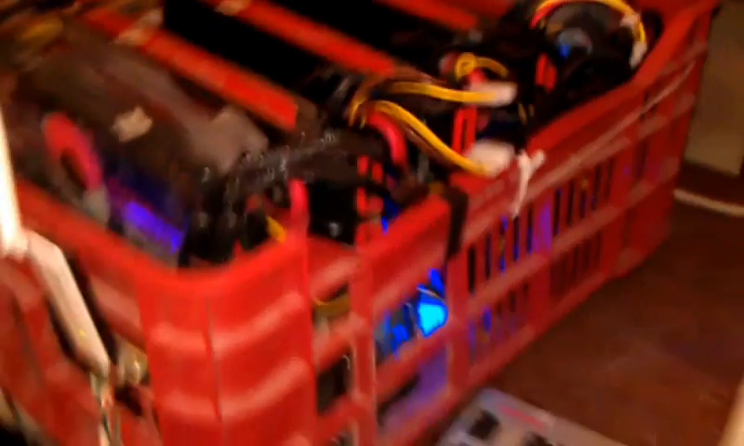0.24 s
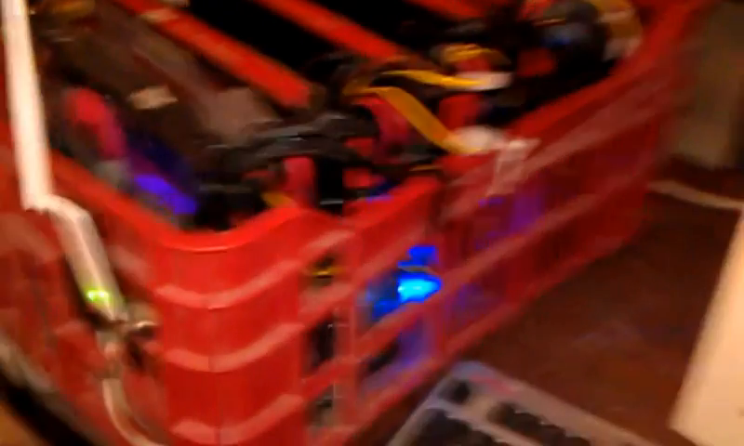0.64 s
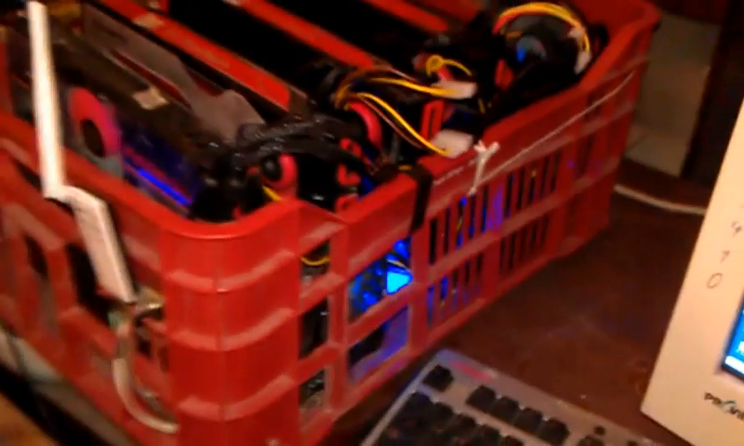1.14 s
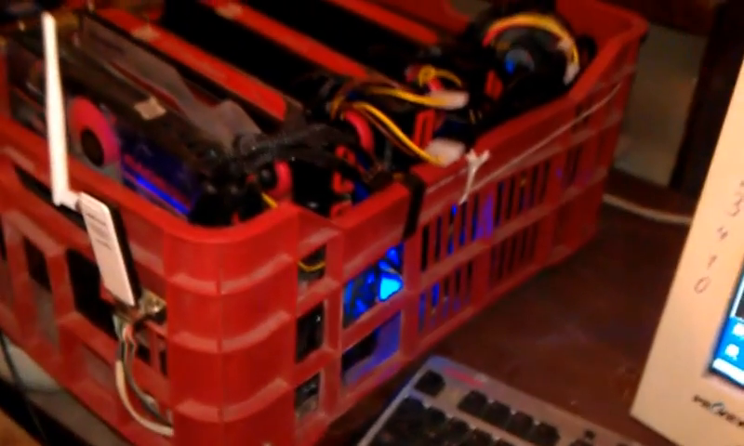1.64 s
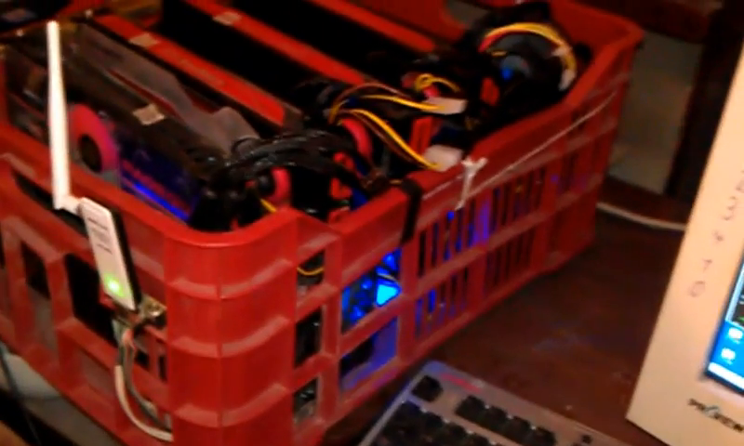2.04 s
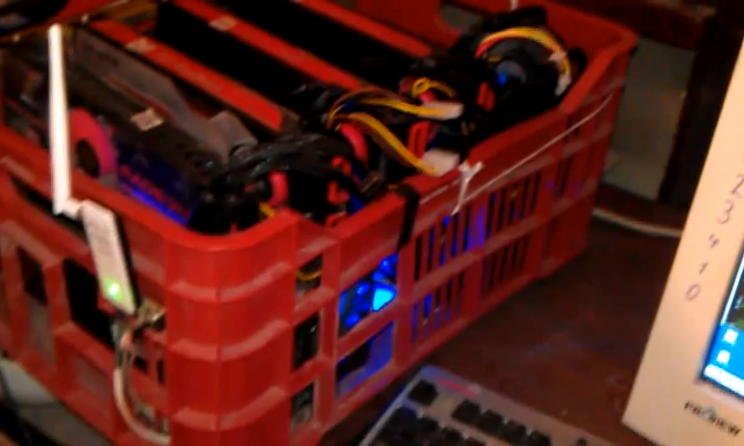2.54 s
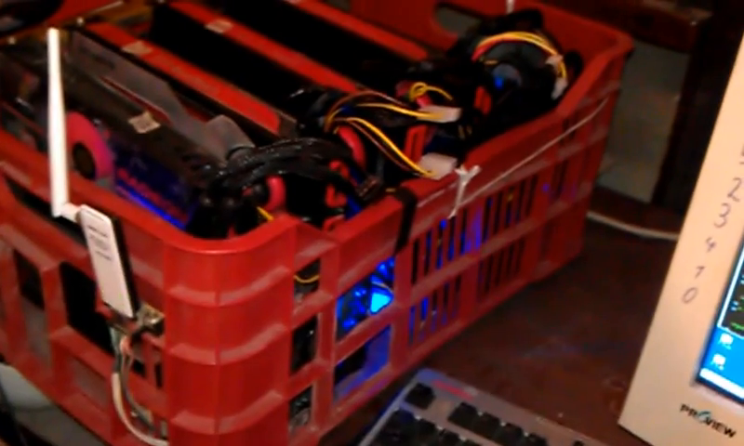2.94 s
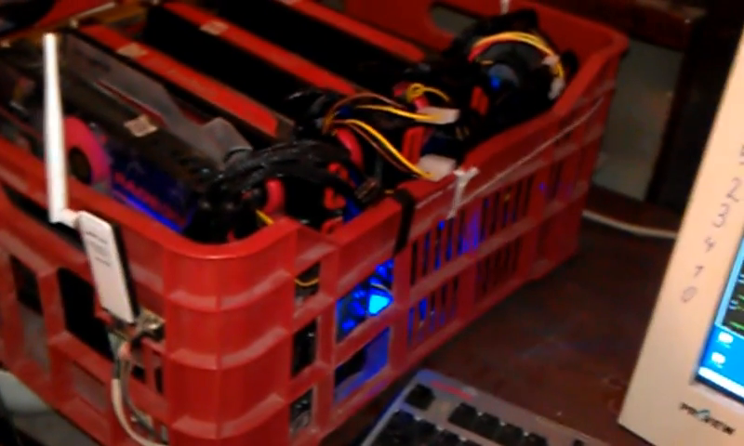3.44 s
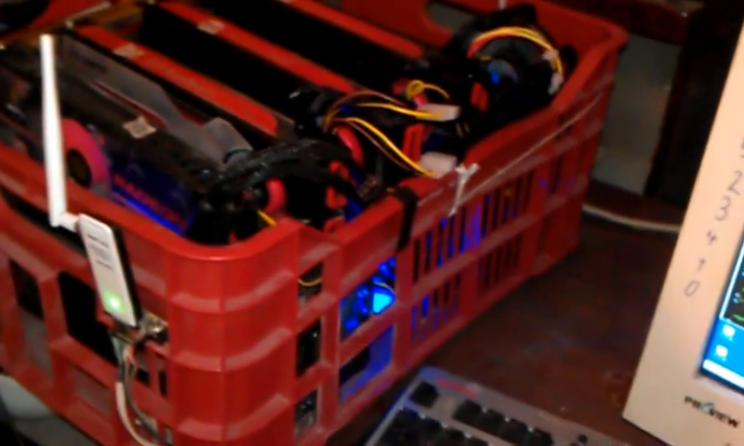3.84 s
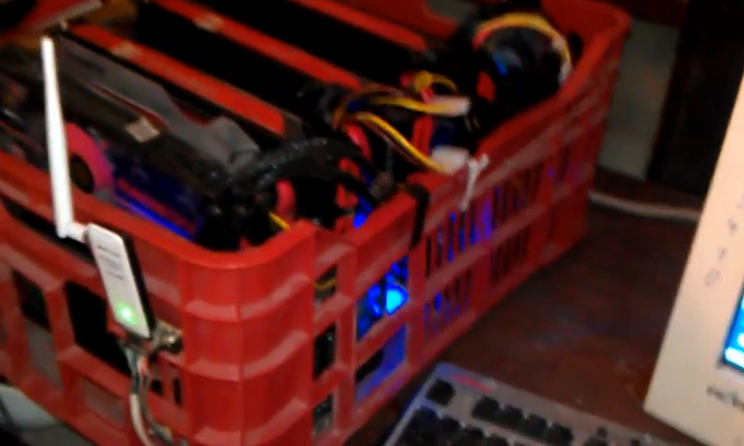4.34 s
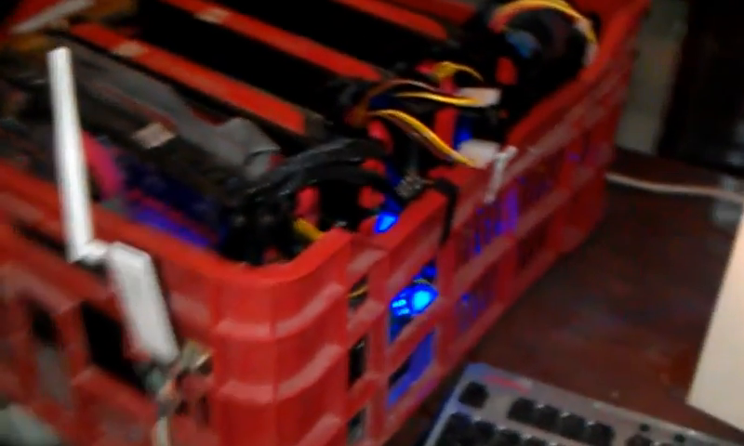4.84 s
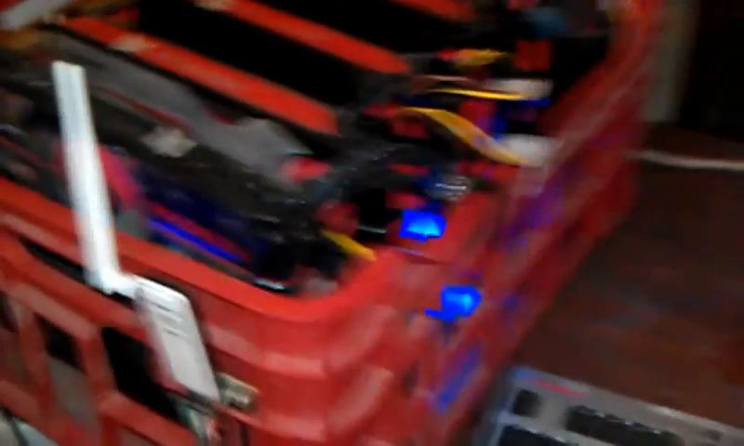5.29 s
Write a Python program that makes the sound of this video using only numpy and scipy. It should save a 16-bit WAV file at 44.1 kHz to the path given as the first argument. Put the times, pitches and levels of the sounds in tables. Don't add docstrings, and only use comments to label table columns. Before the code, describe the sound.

A loud, continuous whoosh of many small computer fans fills the whole 5.5 seconds, even and nearly flat, with hollow midrange coloration from the crate and a narrow, hissy treble peak from a hand-held camera's mono microphone. Faint hums sit inside it around 300 and 450 Hz, the lower one slowly beating. At 0-1 s fingers brush the camera body, strongest around 0.26 s, with shorter rubs at 0.6 and 0.8 s and dull bumps at about 0.8-0.9 s; thin coil whines near 3.5 kHz come and go. The rush settles a little as the camera backs away, leaving steady air from 1.5 to 3.5 s. Around 4 s a breathy whistle near 1.9 kHz strengthens, then drops as the camera turns. At 4.6 s the plastic shell gives a quick, crackling creak with a small knock. A faint rub follows at 5.3 s while the fan hum grows to the end. Weak treble flickers throughout, with tiny stereo puffs.

```python
import sys
import numpy as np
from scipy import signal
from scipy.fft import rfft, irfft, next_fast_len
from scipy.io import wavfile
from scipy.ndimage import uniform_filter1d

SR = 44100
rng = np.random.default_rng(int(sys.argv[2]) if len(sys.argv) > 2 else 0)


def to_wav(sig):
    pcm = np.clip(np.atleast_2d(sig), -1, 1) * 32767
    pcm = np.round(pcm).astype(np.int16)
    wavfile.write(sys.argv[1], SR, pcm.T)


def level_to_linear(level):
    exponent = np.asarray(level, float) / 20
    return 10 ** exponent


N = 243431

# time_s, nearness to the crate corner [0-1], facing the heat sinks [0-1]
CAMERA_POSE = [
    (0, 0.9, 0.7),
    (.6, 0.57, 0.73),
    (1.0, 0.34, 0.7),
    (2.5, 0.04, 0.75),
    (3.5, 0.27, 0.66),
    (4.0, 0.43, 0.93),
    (4.42, 0.4, 0.76),
    (4.56, 0.6, 0.2),
    (5.05, 0.42, 0.1),
    (5.52, 1.0, .2),
]


def evened(x):
    return x / np.sqrt(np.mean(x ** 2) + 1e-20)


def read(points, hz):
    f, value = np.transpose(points)
    return np.interp(np.log(hz + 1), np.log(f + 1), value)


def columns(rows, t):
    s, *values = np.transpose(rows)
    return [np.interp(t, s, v) for v in values]


def bell(hz, centre_hz, width_hz):
    return 1 / (1 + (2 * (hz - centre_hz) / width_hz) ** 2)


def lift_db(hz, centre_hz, width_hz, db):
    return 10 * np.log10(1 + (level_to_linear(db) ** 2 - 1) * bell(hz, centre_hz, width_hz))


def drift(t, rate):
    f, phase = np.geomspace(rate / 20, rate, 16), rng.random(16)
    return evened(sum(np.sin(2 * np.pi * (a * t + p)) / np.sqrt(a) for a, p in zip(f, phase)))


def arch(t, start, length):
    return np.sin(np.pi * np.clip((t - start) / length, 0, 1)) ** 2


def spells(rows, t):
    power = sum(level_to_linear(db) ** 2 * arch(t, s, length) for s, length, db in rows)
    return 10 * np.log10(power + 1e-8)


def noise(field_db, size):
    a, b = rng.standard_normal(field_db.T.shape + (2,)).T
    bins = (a + 1j * b) * level_to_linear(field_db)
    return signal.istft(bins, nperseg=size, noverlap=size * 3 // 4)[1][:N]


def rush():
    # freq_hz, density_db per Hz
    air_colour = [(25, -32.5), (90, -27), (180, -22.5), (280, -16), (400, -9.5), (560, -11.5), (1000, -9),
                  (1400, -2.5), (2600, -7), (4500, -9.5), (7000, -13), (10900, -17.5), (13200, -24),
                  (15700, -28)]
    # centre_hz, width_hz, lift_db
    cavities = [(232, 29, 6), (350, 180, 2), (737, 134, 11), (1000, 110, -2.5), (900, 37, 5),
                (1166, 170, 2.5), (2320, 370, 2)]
    # centre_hz, width_hz, sign
    wall_bands = [
        (3470, 440, 0.58),
        (4150, 390, -0.93),
    ]
    hz, t = np.fft.rfftfreq(2048, 1 / SR), np.arange(N // 512 + 5) * 512 / SR
    colour_db = read(air_colour, hz) + sum(lift_db(hz, *c) for c in cavities)
    hz = hz[:, None]
    near, facing = columns(CAMERA_POSE, t)

    close = np.exp(-t / 1)
    level_db = -32.5 + 1.1 * close
    body_db = 1 * near + 0 * close
    sink_db = 5.5 * facing
    wall_db = 0.6 + 4.5 * arch(t, start=0.1, length=1.0)

    patches = rng.standard_normal((len(t), len(colour_db))).T
    patches = uniform_filter1d(patches, size=24, axis=0)
    patches = evened(uniform_filter1d(patches, size=10, axis=1))
    gusts = evened(uniform_filter1d(rng.standard_normal(len(t)), size=6))
    low = 1 / (1 + (hz / 1050) ** 4)
    gusty = 1 / (1 + (hz / 90) ** 2)

    field_db = colour_db[:, None] + low * (body_db - body_db.mean())
    field_db += 0.37 * patches + 0.25 * drift(t, rate=10)
    field_db += 4.0 * gusty * gusts
    field_db += level_db - level_db.mean()
    field_db += sink_db * bell(hz, centre_hz=1860, width_hz=260)
    field_db += 5.8 * (facing.mean() - facing) * bell(hz, centre_hz=1100, width_hz=420)
    field_db += wall_db * sum(sign * bell(hz, f, width) for f, width, sign in wall_bands)
    return level_to_linear(level_db.mean() - 0.02) * evened(noise(field_db, size=2048))


def tone(hz, db, wander_hz, waver_db):
    t = np.arange(0, N, 64) / SR
    wander, waver = (np.repeat(drift(t, rate), 64)[:N] for rate in (6.0, 12.0))
    turns = np.cumsum(hz + wander_hz * wander) / SR + rng.random()
    level_db = db + waver_db * uniform_filter1d(waver, size=64)
    return np.sqrt(2) * level_to_linear(level_db) * np.sin(2 * np.pi * turns)


def tones():
    # pitch_hz, level_db rms, wander_hz, waver_db
    steady_blades = [(150.7, -68, 1.2, 2), (377, -58, 1.5, 2), (403, -60, 2.5, 3), (640.5, -57, 1.5, 3),
                     (756, -52, 3.5, 3)]
    # start_hz, settled_hz, settling_s
    fan_speeds = [
        (303.6, 301.5, 1.6),
        (445.9, 449, 9),
        (3556, 3528, 4),
        (3459, 3452, .4),
    ]
    # start_s, length_s, top_db rms
    high_spells = [(-.5, 1, -48), (.25, 0.57, -47.5), (.95, 0.53, -48), (2.0, 1.8, -53), (3.2, 2.3, -51)]
    low_spells = [(.33, 0.55, -43.5), (.7, 0.42, -48), (1.7, 0.26, -55)]
    t = np.arange(N) / SR
    near, facing = columns(CAMERA_POSE, t)
    pitches = [end + (start - end) * np.exp(-t / settle) for start, end, settle in fan_speeds]

    beat_db = 2 * np.exp(-t / 3.5) * np.cos(2 * np.pi * (t - 0.17) / 1.24)
    pair_db = -52.5 + beat_db
    corner_db = -53.5 + 10 * near
    levels = [pair_db, corner_db, spells(high_spells, t), spells(low_spells, t)]
    clear = sum(tone(hz, db, wander_hz=0.7, waver_db=1.2) for hz, db in zip(pitches, levels))
    sink_whistle = tone(1873, -70 + 24.5 * facing, wander_hz=9, waver_db=2.5)
    return clear + sink_whistle + sum(tone(*row) for row in steady_blades)


def rubbing():
    # freq_hz, density_db per Hz
    skin_colour = [(300, -19), (1000, -5), (1700, 1.5), (3000, -3.5), (4500, -8), (7000, -7),
                   (11000, -13.5), (15700, -16.5)]
    # peak_s, level_db rms, width_s
    strokes = [
        (.01, -38, 0.081),
        (.26, -33, 0.084),
        (.625, -35, .05),
        (.79, -35, 0.029),
        (4.615, -36, .035),
        (5.32, -39.5, 0.032),
    ]
    hz, t = np.fft.rfftfreq(256, 1 / SR), np.arange(N // 64 + 5) * 64 / SR
    flicker = evened(uniform_filter1d(rng.standard_normal(len(t)), size=3))
    rub = evened(noise(read(skin_colour, hz)[:, None] + 0.74 * flicker, size=256))
    t = np.arange(N) / SR
    power = sum(level_to_linear(db) ** 2 * np.exp(-((t - s) / width) ** 2) for s, db, width in strokes)
    grip_db = -40.5 - 19 * np.maximum(t - 1, 0)
    power += level_to_linear(grip_db) ** 2
    return np.sqrt(power) * rub


def handling():
    # start_s, level_db rms, t60_s, low_modes_db
    slips = [
        (4.5935, -30, 0.03, -8),
        (4.601, -29, 0.04, -6),
        (4.6135, -22, 0.022, -8),
        (4.6195, -27, 0.055, -7),
        (4.64, -32, .025, -12),
    ]
    # start_s, peak_db, pitch_hz, t60_s
    bumps = [
        (.765, -50, 89, .08),
        (.803, -38, 116, 0.12),
        (0.808, -36, 212, 0.061),
        (.82, -46, 60, .16),
        (.86, -43, 140, .08),
        (.885, -50, 75, .12),
        (.915, -49, 110, .08),
        (.93, -52, 45, .12),
        (4.602, -39, 207, 0.13),
    ]
    # centre_hz, width_hz, level_db
    shell = [(2480, 940, 3.5), (3430, 880, 8), (6920, 820, 1), (9400, 2500, -9), (12500, 5200, -7.5),
             (15500, 1200, -9)]
    out, t = np.zeros(N), np.arange(4096) / SR
    hz = np.fft.rfftfreq(len(t), 1 / SR)
    modes = np.array([level_to_linear(db) * bell(hz, f, width) for f, width, db in shell])
    hisses = rng.standard_normal((len(slips), len(t)))
    for (s, db, t60, low_db), hiss in zip(slips, hisses):
        colour = level_to_linear(low_db) * modes[:2].sum(0) + modes[2:].sum(0)
        ring = evened(irfft(rfft(hiss) * colour))
        envelope = level_to_linear(db - 60 * t / t60) * np.minimum(t / 0.001, 1)
        out[round(s * SR):][:len(t)] += envelope * ring
    for s, db, f, t60 in bumps:
        envelope = level_to_linear(db - 60 * t / t60) * np.minimum(t / 0.0077, 1)
        out[round(s * SR):][:len(t)] += envelope * np.sin(2 * np.pi * f * t)
    return out


def side_puffs():
    # centre_s, low_hz, high_hz, level_db rms
    puffs = [(.152, 10300, 11800, -48), (.779, 10300, 13200, -44), (3.263, 5140, 7000, -38),
             (3.612, 5130, 6260, -41), (3.612, 8900, 10400, -40), (3.612, 13000, 14500, -58),
             (3.844, 8200, 9800, -34), (4.935, 4150, 5780, -38), (5.376, 4600, 5800, -46),
             (5.376, 10200, 11700, -46)]
    out, hz = np.zeros(N), np.fft.rfftfreq(1400, 1 / SR)
    for (s, low_hz, high_hz, db), hiss in zip(puffs, rng.standard_normal((len(puffs), 1400))):
        band = evened(irfft(rfft(hiss) * (hz > low_hz) * (hz < high_hz)))
        start = round(s * SR) - len(band) // 2
        out[start:][:len(band)] += level_to_linear(db) * band * np.hanning(len(band))
    return np.array([out, -out])


def flickering_holes(x):
    # freq_hz, bar_db from the usual level
    bar = [(30, -4), (130, -13), (250, -22), (5000, -16), (9800, -13), (10350, -3), (10980, 4),
           (11040, -12), (12500, -7), (13500, -3), (14300, 0), (14900, 3), (15200, 0), (15700, -1)]
    hz, _, z = signal.stft(x, SR, window="cosine", nperseg=2048, noverlap=1024)
    usual = np.median(uniform_filter1d(abs(z), size=17, axis=0), axis=1)[:, None]
    jump = evened(uniform_filter1d(rng.standard_normal((z.shape[1], 33)), size=3, axis=0)).T
    bar_db = read(bar, hz)[:, None] + 3.5 * jump[np.arange(len(hz)) // 32]
    kept = z * (abs(z) > usual * level_to_linear(bar_db))
    return signal.istft(kept, SR, window="cosine", nperseg=2048, noverlap=1024)[1][:N]


def scene():
    return np.tile(rush() + tones() + rubbing() + handling(), (2, 1))


def band_limit(x):
    return signal.sosfilt(signal.butter(12, 15720, fs=SR, output="sos"), x)


def record(dry):
    size = next_fast_len(N + 4096)
    hz = np.fft.rfftfreq(size, 1 / SR)
    port = level_to_linear(lift_db(hz, centre_hz=8517, width_hz=840, db=18.66))
    heard = irfft(rfft(dry[0], size) * port, size)[:N]
    return band_limit(flickering_holes(heard) + side_puffs())


dry = scene()
out = record(dry)
to_wav(out)
```